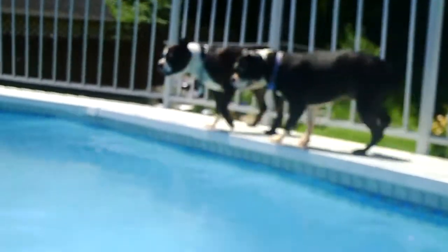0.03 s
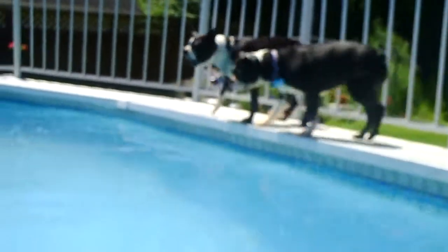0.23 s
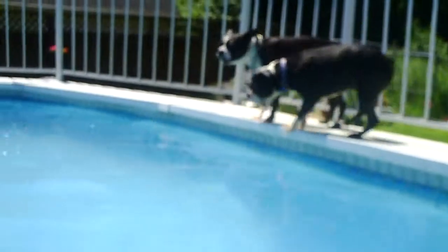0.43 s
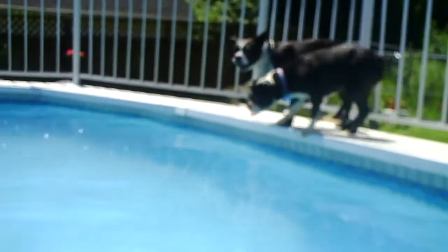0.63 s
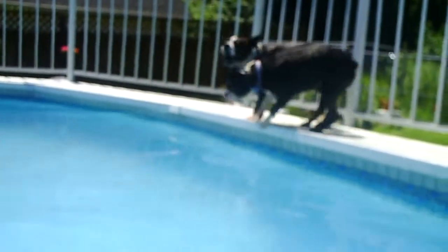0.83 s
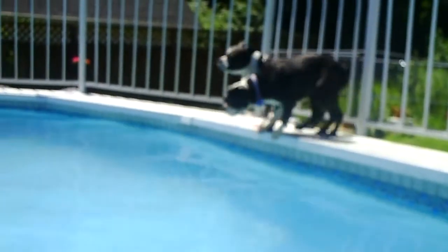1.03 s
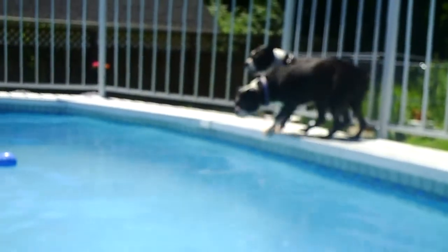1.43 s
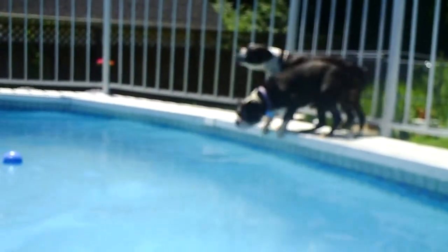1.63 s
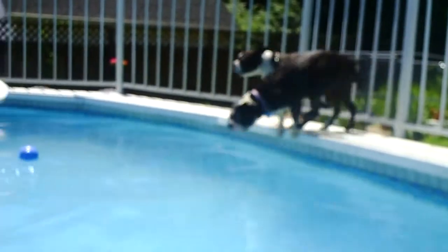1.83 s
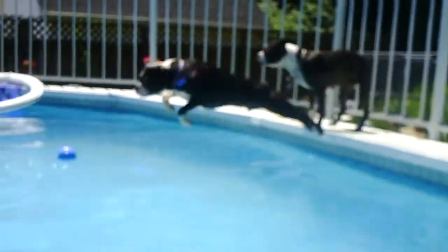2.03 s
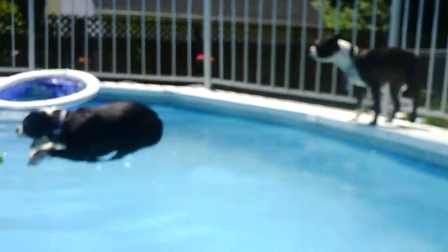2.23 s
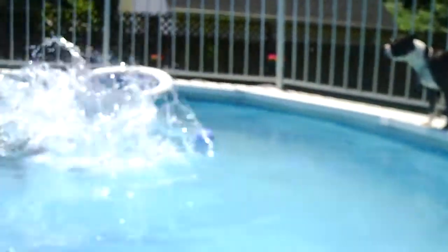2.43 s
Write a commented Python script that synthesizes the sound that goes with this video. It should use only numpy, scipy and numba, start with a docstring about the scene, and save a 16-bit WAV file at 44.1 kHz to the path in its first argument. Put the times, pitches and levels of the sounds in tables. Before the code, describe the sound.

Three high, yelping dog barks by a backyard pool, followed by a splash.

```python
"""A backyard pool, heard through a small, dull microphone over low air, hiss and a distant motor.
A faint bark tail dies away as two small dogs patter along the edge. One gives three shrill barks,
arching yelps that break into a rasp near the top, close enough to overload the microphone; water
plops between them. Then paws scrabble and thump on the hollow rim, and a dog lands in the water
with a slap, gulps and spray. Fence and house throw it all back."""
import sys
import numpy as np
from scipy import signal
from scipy.fft import rfft, irfft, next_fast_len
from scipy.io import wavfile
from numba import njit

SR = 44100
rng = np.random.default_rng(int(sys.argv[2]) if len(sys.argv) > 2 else 0)


def persist_wave(psi):
    """Save psi, clipped to +-1, as 16-bit WAV."""
    counts = np.round(np.clip(psi, -1, 1) * 32767).astype(np.int16)
    wavfile.write(sys.argv[1], SR, np.atleast_2d(counts).T)


N = 114660


def undb(db):
    return 10 ** (np.asarray(db) / 20)


def unit(x):
    return x / np.sqrt(np.mean(x ** 2) + 1e-18)


def clock():
    return np.arange(N) / SR


def colour(x, points):
    """Filter causally by (Hz, dB) points."""
    hz, db = np.array(points).T
    size = next_fast_len(2 * len(x))
    size += size % 2
    gain = undb(np.interp(np.log(np.fft.rfftfreq(size, 1 / SR) + 1), np.log(hz), db))
    cepstrum = irfft(np.log(gain))
    cepstrum[1:size // 2] *= 2
    cepstrum[size // 2 + 1:] = 0
    return irfft(rfft(x, size) * np.exp(rfft(cepstrum)))[:len(x)]


def dull(x, top_hz=5487):
    """The microphone's narrow band: a steep, smooth roll-off."""
    hz = np.fft.rfftfreq(N, 1 / SR)
    return irfft(rfft(x) / np.sqrt(1 + (hz / top_hz) ** 56), N)


def wander(rate_hz):
    """Smooth random drift with spread 1."""
    return unit(signal.sosfilt(signal.butter(2, rate_hz, fs=SR, output="sos"), rng.standard_normal(N)))


def swell(points):
    """Gain through (s, dB) points, silent outside them."""
    s, db = np.array(points).T
    return undb(np.interp(clock(), s, db, left=-200, right=-200))


def blow(start, attack, decay):
    """A quick rise, then an exponential fade."""
    age = (clock() - start).clip(0, None)
    return np.minimum(age / attack, 1) * np.exp(-(age - attack).clip(0, None) / decay)


def grit(spread):
    """Dense clicks of uneven size."""
    return unit(rng.standard_normal(N) * np.exp(spread * wander(537)))


@njit
def band(x, hz, width):
    """Band-pass with a moving centre, gain 1."""
    out, mid, low = np.empty(len(x)), 0., 0.
    for i in range(len(x)):
        g, damping = np.tan(np.pi * hz[i] / SR), width / hz[i]
        v = (mid + g * (x[i] - low)) / (1 + g * (g + damping))
        mid, low = 2 * v - mid, low + 2 * g * v
        out[i] = damping * v
    return out


def air_and_motor(air_db=-43.5, hum_hz=111, hum_db=-49):
    """Low outdoor air and the wavering hum of a distant motor."""
    # The murmur of the air. Each row: frequency in Hz, gain in dB.
    air_colour = [(25, 6.5), (127, -2), (156, 0), (358, -1.5), (563, -14.5), (826, -6), (1080, -6),
                  (1630, -18.5), (2330, -24.5), (3420, -30), (5030, -41.5)]
    air = unit(dull(colour(rng.standard_normal(N), air_colour))) * undb(air_db + wander(8.6))
    turns = np.cumsum(hum_hz * (1 + .013 * wander(4.17))) / SR
    return air + unit(np.sin(2 * np.pi * turns)) * undb(hum_db + 4 * wander(6))


def hiss():
    """Background treble hiss that dips after the second bark and creeps back."""
    # Each row: time in seconds, level in dB.
    hiss_levels = [(0, -47), (.17, -45), (.5, -45.5), (.64, -48), (.8, -42.5), (1.05, -44.5), (1.25, -60),
                   (1.45, -54.5), (2.0, -50.5), (2.28, -54.5), (2.6, -42.5)]
    # Its tone. Each row: frequency in Hz, gain in dB.
    hiss_colour = [(300, -12.5), (1400, 1.5), (2300, -14.5), (3400, -7.5), (4800, -12), (6000, -16.5)]
    return unit(dull(colour(grit(.45), hiss_colour))) * swell(hiss_levels)


def bubble(age, hz, decay, rise=.067):
    """A ring like an air pocket's, rising in pitch as it fades."""
    phase = 2 * np.pi * hz * age * (1 + rise * age / decay / 2)
    return np.sin(phase) * np.exp(-age / decay) * (1 - np.exp(-age * hz))


def bark_tail_and_gulps():
    """A faint bark tail dies away; later water plops at the wall and the plunge traps air pockets."""
    # Each row: start in seconds, pitch in Hz, level in dB, decay in seconds. The bark tail is first.
    rings = [(.002, 684, -30, 0.01), (0.703, 909, -34, 0.0099), (1.138, 928, -20, .007),
             (2.33, 320, -17.5, 0.015), (2.362, 883, -15.5, 0.011), (2.44, 882, -20, 0.0136),
             (2.531, 223, -24, 0.025), (2.561, 1470, -29, 0.016), (2.575, 265, -26, 0.013)]
    return sum(undb(db) * bubble((clock() - s).clip(0, None), hz, decay) for s, hz, db, decay in rings)


def paws(attack_s=.002):
    """Claws and pads make short gritty scrapes on the pool edge."""
    # Each row: start in seconds, level in dB, brightness in dB per octave, decay in seconds.
    steps = [(0.028, -39, -11, 0.013), (0.147, -33.5, -5, 0.017), (0.173, -37.5, 2, 0.016),
             (0.207, -34.5, -7, 0.027), (0.468, -37.5, -1, 0.0033), (.609, -39.5, 1.5, 0.0068),
             (0.99, -27, 16.5, 0.0011), (1.181, -39, 0, 0.0055), (1.838, -40, 19, 0.0077),
             (1.927, -25.5, -3.5, 0.02), (2.057, -29, -8, 0.035), (2.094, -24.5, -2, 0.0089),
             (2.11, -24, -2.5, 0.018)]
    # The tone of a scrape. Each row: frequency in Hz, gain in dB.
    scrape_colour = [(150, -6.5), (450, -21.5), (800, -10), (1200, -5.5), (1550, 5), (2200, -18.5),
                     (3100, -6), (4000, -15), (5500, -20)]
    spectrum = rfft(dull(colour(grit(.35), scrape_colour)))
    octaves = np.log2(np.fft.rfftfreq(N, 1 / SR).clip(700, 5000) / 1500)
    out = np.zeros(N)
    for start, db, tilt, decay in steps:
        scrape = unit(irfft(spectrum * undb(tilt * octaves), N))
        out += undb(db) * blow(start, attack_s, decay) * scrape
    return out


def yelp(pitch, rough, db_per_octave=-8.5, flutter_hz=390):
    """Harmonics of the vocal folds, weighted by the throat; flutter and jitter grow with roughness."""
    # The throat's resonances. Each row: frequency in Hz, gain in dB.
    throat = [(300, -19), (550, -24), (850, 16.5), (1300, -5), (1650, 1.5), (2100, -3.5), (2900, -12.5),
              (3900, -18), (4900, -4), (6000, -62)]
    hz, db = np.array(throat).T
    flutter = np.sin(2 * np.pi * np.cumsum(flutter_hz * (1 + .15 * wander(84.5))) / SR)
    jitter = (.02565 + .07 * rough) * wander(304.7)
    phase = 2 * np.pi * np.cumsum(pitch * (1 + jitter)) / SR
    harmonic = np.arange(1, 9)[:, None]
    gains = undb(np.interp(np.log(harmonic * pitch), np.log(hz), db) + db_per_octave * np.log2(harmonic))
    voice = (gains * np.sin(harmonic * phase)).sum(0) / np.sqrt((gains ** 2).sum(0) / 2)
    return voice * (1 + 1.1 * rough * flutter)


def rasp(pitch, rest_pitch_hz=1104.3, breath_db=-9.5):
    """The folds slap irregularly; pulses and air ring the mouth, which opens as the pitch climbs."""
    # The mouth at rest. Each row: resonance in Hz, nominal width in Hz, level in dB.
    resonances = [(860, 142, 0.5), (1170, 168, 1.5), (1390, 157, -4.5), (1850, 190, -22),
                  (2700, 420, -19.5), (3270, 600, -22), (4670, 1130, -17.5)]
    climb = pitch / rest_pitch_hz
    pulse_hz = 331.1 * np.sqrt(climb) * np.exp(.22 * wander(200))
    pulses = np.diff(np.floor(np.cumsum(pulse_hz) / SR), prepend=0)
    source = unit(pulses) + undb(breath_db) * rng.standard_normal(N)
    opening = climb ** .24
    out = np.zeros(N)
    for hz, width, db in resonances:
        once = band(source, hz * opening, 1.33 * width)
        out += undb(db) * unit(band(once, hz * opening, 1.33 * width))
    return unit(out)


def barks(muzzle_hz=557):
    """Each bark passes between clean yelp and rasp; the small muzzle takes the bass from the yelp."""
    # One list per bark. Each row: time in seconds, pitch in Hz, level in dB, roughness from 0 to 1.
    contours = [
        [(.233, 520.1, -38, 0.5), (.239, 656.7, -13.5, 0.77), (.244, 799.2, -13.5, 0.65), (.25, 890.7, -1, 0),
         (.254, 936.7, -5, 0.65), (.259, 983, 5.5, 0.11), (.273, 1024, 5, 0.31), (.284, 1152, -3, 0.16),
         (.291, 1473, 1.5, 0.44), (.31, 1410, -6, 0.76), (.33, 1374, -11, 0.46), (.344, 1352, -17.5, 0.48),
         (.351, 795, -4, 0.16), (.358, 763, -3.5, 0.2), (.365, 904.4, -14.5, 0.6), (.376, 963, -7.5, 0.43),
         (.394, 741, -18, 0.35), (.404, 617.7, -32, 0.54)],
        [(.825, 437, -36, 0.32), (.832, 593.6, -19, 0.39), (.846, 798.2, -3, 0.79), (.86, 902.5, 0.5, 0.05),
         (.87, 1034, -2, 0.54), (.88, 1306, -3.5, 0.28), (.9, 1150, -2, 0.55), (.912, 904.4, -3, 0.38),
         (.929, 860, 1.5, 0.36), (.937, 795.3, -12.5, 0.82), (.949, 780.5, -11.5, 0.57), (.956, 899.6, -3, 0),
         (.965, 904.4, -3, 0.43), (.976, 829, -4, 0.09), (.984, 709.7, -18.5, 0.05), (1.0, 570, -34.5, 0.1)],
        [(1.509, 449, -32, 0.24), (1.515, 456.9, -22.5, 0.16), (1.524, 519.8, -25.5, 0.25),
         (1.53, 626, -19, 0.17), (1.54, 778, -15.5, 0.71), (1.547, 855.5, -11, 0.43), (1.555, 983, -1.5, 0.27),
         (1.568, 1065, -1, 0.2), (1.58, 1170, -3.5, 0.29), (1.593, 1478, -12.5, 0.64), (1.61, 1598, -11, 0.26),
         (1.632, 1618, -13.5, 0.31), (1.646, 1317, -2.5, 0.08), (1.654, 1146, -3, 0.48),
         (1.66, 855, -2.5, 0.12), (1.674, 652, -12, 0.13), (1.683, 550, -40, 0)],
    ]
    s, hz, _, roughness = np.concatenate(contours).T
    pitch = np.interp(clock(), s, hz)
    rough = np.interp(clock(), s, roughness).clip(.1, 1)
    effort = sum(swell(np.array(bark)[:, ::2]) for bark in contours)
    muzzle = signal.butter(4, muzzle_hz, "high", fs=SR, output="sos")
    clean = signal.sosfilt(muzzle, yelp(pitch, rough))
    return effort * ((1 - rough) * clean + rough * rasp(pitch)) / np.hypot(1 - rough, rough)


def rim_thuds():
    """The hollow pool rim booms softly under a paw."""
    # Each row: start in seconds, pitch in Hz, level in dB, decay in seconds.
    thumps = [(.705, 146, -46, 0.017), (1.923, 175, -41, 0.11), (2.071, 208.6, -38.5, 0.17)]
    out = np.zeros(N)
    for start, hz, db, decay in thumps:
        age = (clock() - start).clip(0, None)
        out += undb(db) * np.sin(2 * np.pi * hz * age + .5 * wander(44)) * np.exp(-age / decay)
    return out


def slap(attack_s=.0025):
    """The dog's body smacks the water, part after part, with a crackle."""
    # Each row: start in seconds, level in dB, decay in seconds.
    smacks = [(2.288, -39.5, 0.021), (2.299, -20, 0.014), (2.3089, -13, 0.0028), (2.32, -22.5, 0.019),
              (2.331, -22.5, 0.014), (2.346, -26, .01), (2.356, -16.5, 0.0047)]
    # The tone of the impact. Each row: frequency in Hz, gain in dB.
    smack_colour = [(100, -9), (320, 0), (520, -7), (850, 7), (1450, 1.5), (2200, -3.5), (3000, -7),
                    (4000, -6), (5200, -10.5)]
    crackle = unit(dull(colour(grit(.38), smack_colour)))
    return crackle * sum(undb(db) * blow(s, attack_s, decay) for s, db, decay in smacks)


def spray(bubbles_per_s=1100, spread_db=22, decay_cycles=6.5, fizz_db=-2):
    """Fizzing spray and a froth of small ringing bubbles follow the plunge."""
    # The surge of spray. Each row: time in seconds, level in dB.
    levels = [(2.3, -69), (2.361, -28), (2.44, -29.5), (2.5, -29.5), (2.55, -36), (2.6, -31.5)]
    # Its tone. Each row: frequency in Hz, gain in dB.
    spray_colour = [(59, -73), (100, -4), (231, 1.5), (313, -9.5), (445, -4.5), (517, -14), (601, -5),
                    (870, 0), (1200, -9), (1390, -10.5), (5500, -32.5), (7150, -61), (12100, -120)]
    start, span = levels[0][0], levels[-1][0] - levels[0][0]
    age, froth = clock()[:SR // 8], np.zeros(N + SR)
    for when, note, size in rng.random((int(bubbles_per_s * span), 3)):
        hz = 200 * 25 ** note
        i = int((start + when * span) * SR)
        froth[i:i + len(age)] += hz * undb(spread_db * size) * bubble(age, hz, decay_cycles / hz)
    froth = unit(froth[:N]) * np.sqrt(span * SR / N)
    fizz = undb(fizz_db) * unit(dull(grit(.31)))
    wash = colour(froth + fizz, spray_colour)
    return wash / wash[int(start * SR):].std() * swell(levels)


def yard(x, early_db=-23, early_s=.03, tail_db=-25, t60_s=.88):
    """Echoes from water, fence and house reach the microphone, with a faint long tail."""
    # Each row: delay in seconds, level in dB.
    echoes = [(.0065, -20), (.021, -22.5), (.041, -20), (.054, -25.5)]
    # The tone of the scattered sound. Each row: frequency in Hz, gain in dB.
    yard_colour = [(150, 5), (600, -5.5), (1100, 0), (1600, 4.5), (2300, -3), (3400, 4.5), (5000, 2)]
    t = clock()[:SR]
    early, tail = rng.standard_normal((2, SR)) * (t > .008)
    early = undb(early_db) * unit(early * np.exp(-t / early_s / 2))
    tail = undb(tail_db) * unit(tail * undb(-60 * t / t60_s))
    response = colour(early + tail, yard_colour) / np.sqrt(SR)
    for delay, db in echoes:
        response[int(delay * SR)] += undb(db)
    return x + signal.fftconvolve(x, response)[:N]


def scene():
    """Dogs and water sound in the yard, over the air and the far motor; one channel."""
    poolside = barks() + paws() + hiss() + rim_thuds() + spray() + slap() + bark_tail_and_gulps()
    return (yard(poolside) + air_and_motor())[None]


def record(dry, input_clip=.67, output_clip=.68, top_hz=15800):
    """The barks overload a slow converter; what overshoots after its narrow band clips once more."""
    overloaded = np.clip(dull(dry), -input_clip, input_clip)
    sampled = overloaded * 4 * (np.arange(N) % 4 == 0)  # a quarter of the sample rate
    heard = np.clip(dull(sampled), -output_clip, output_clip)
    return signal.sosfilt(signal.ellip(8, .2, 70, top_hz, fs=SR, output="sos"), heard)


dry = scene()
out = record(dry)
persist_wave(out)
```